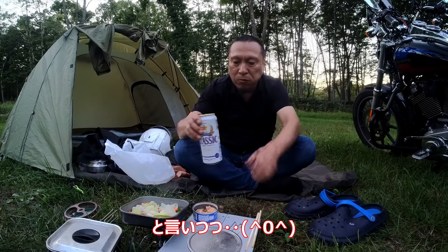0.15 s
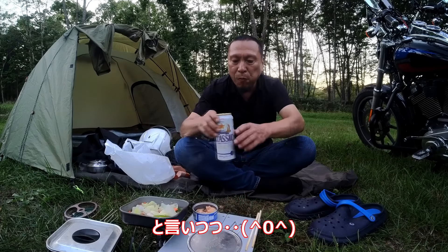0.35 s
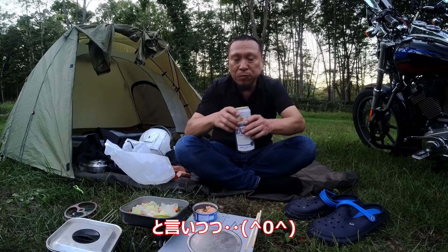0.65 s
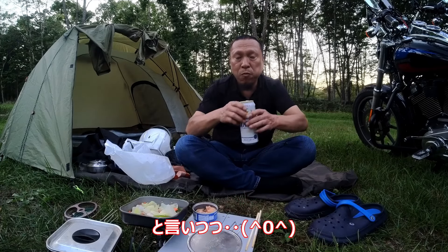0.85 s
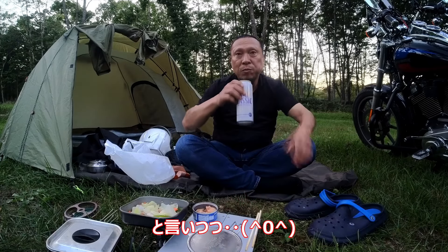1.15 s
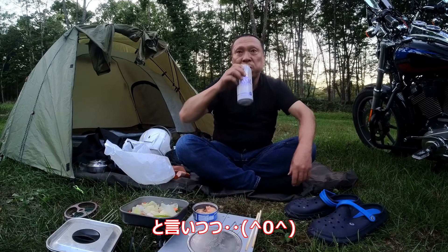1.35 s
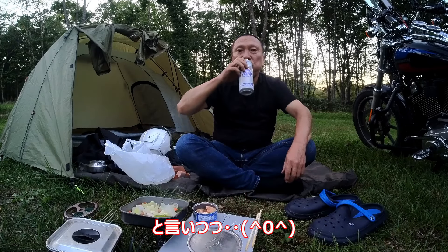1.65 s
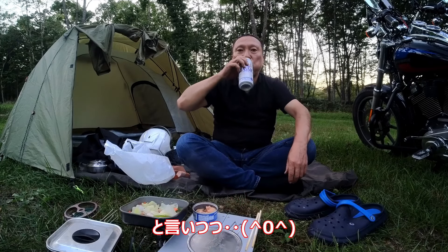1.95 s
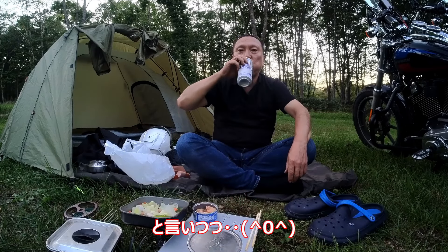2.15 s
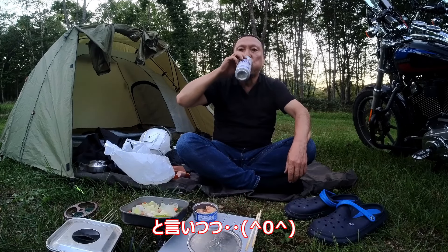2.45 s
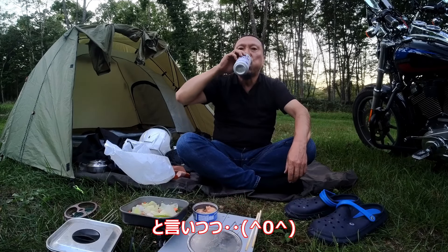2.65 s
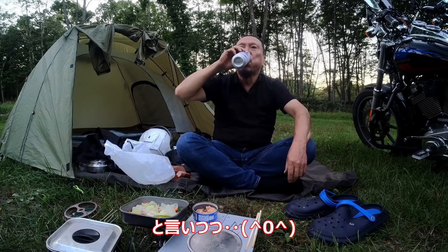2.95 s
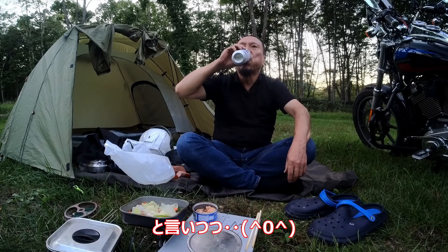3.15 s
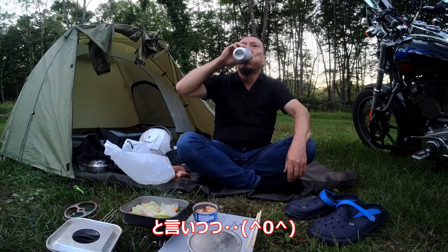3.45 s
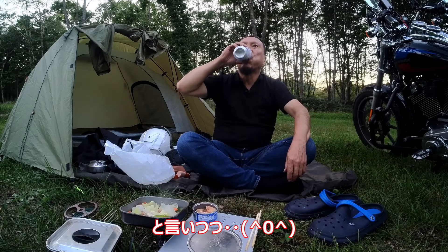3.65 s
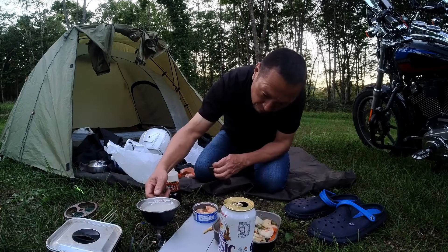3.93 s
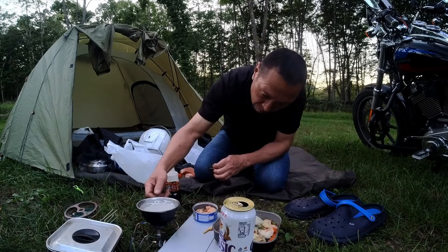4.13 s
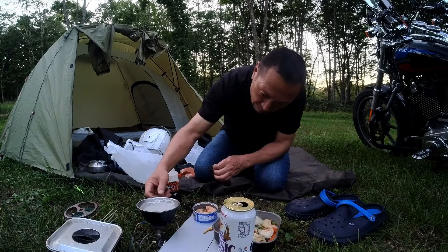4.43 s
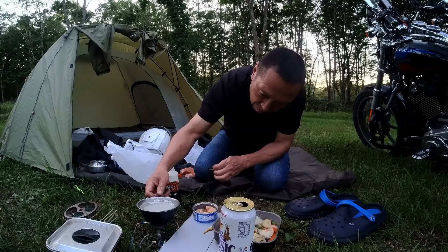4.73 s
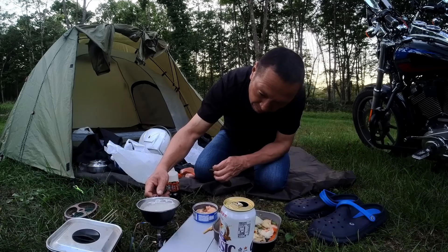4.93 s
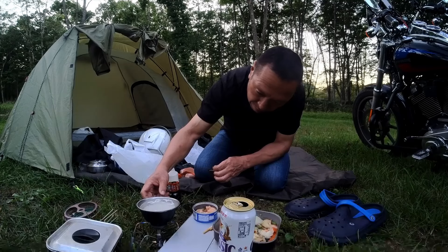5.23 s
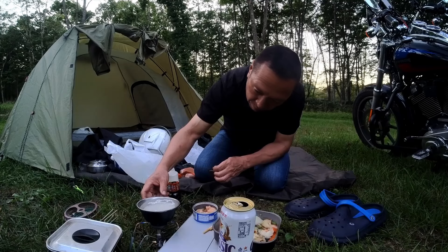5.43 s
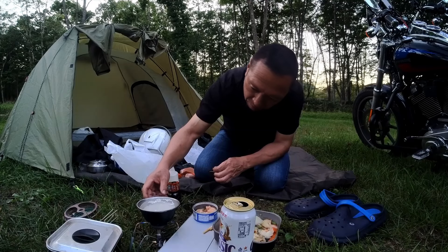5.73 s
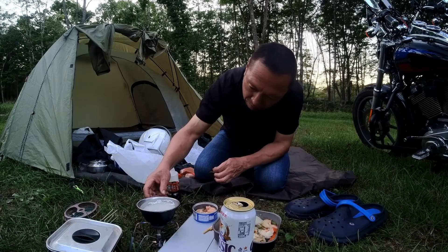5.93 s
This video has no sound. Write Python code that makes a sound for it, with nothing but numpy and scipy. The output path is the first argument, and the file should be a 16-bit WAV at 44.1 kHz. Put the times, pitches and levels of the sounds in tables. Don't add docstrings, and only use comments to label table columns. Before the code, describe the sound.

Close to a camping stove on grass, a steady rushing gas roar mixes with fine fat sizzle, irregular metallic pan ticks and sharp spits. A drink can is tapped once early on. After nearly four seconds the sound cuts hard to a far quieter hiss under a pot, with soft flame puffs, faint breeze rumble and very distant crickets. Small stereo microphone, dry open air.

```python
import sys
import numpy as np
from scipy import signal
from scipy.fft import rfft, irfft, next_fast_len
from scipy.io import wavfile
from scipy.ndimage import uniform_filter1d, map_coordinates

SR = 44100
rng = np.random.default_rng(int(sys.argv[2]) if len(sys.argv) > 2 else 0)


def store_pcm(level_fs):
    pcm = np.round(np.clip(level_fs, -1, 1) * 32767).astype(np.int16)
    wavfile.write(sys.argv[1], SR, np.atleast_2d(pcm).T)


def voltage_ratio(level):
    return 10 ** (np.asarray(level, float) / 20)


N = 268216
CUT_S = 3.7893

# pitch_hz [Hz], left_db [dB], right_db [dB], likeness [0-1], left_lead [rad]
ROAR_COLOUR = [(525, -40, -42, .9, .1), (596, -17, -20, 1, .1), (684, -4.5, -4, 0.8, 0.18),
               (1050, -2.5, -3, 0.91, 0.33), (1690, -8.5, -7, 1, 0.97), (2275, -6, -3.5, 0.34, 0.84),
               (2990, 0.5, 5.5, 0.69, 2.15), (3476, 1, 0, 1, 2.39), (4500, -2, -15.5, 0.6, 1.67),
               (5140, 1.5, -5.5, 0.73, 2.35), (5850, -5.5, -30, 0.2, 13), (6260, -5, -37.5, .38, 8.2),
               (7370, -9, -26, 0.05, 9.4), (8740, -24, -46.5, .12, 9.6), (9280, -37, -43.5, 0.06, 9.6)]
# pitch_hz [Hz], width_hz [Hz], boost_db [dB]
PAN_AIR = [(1074, 214, 3.5), (1452, 106, 4.5), (1860, 220, 7.5), (2590, 44, 4), (3030, 36, 2.5),
           (5110, 200, 0.5)]
# start_s [s], level_db [dB]
HIGH_FLOW = [
    (0, -39.5),
    (.3, -39.5),
    (1.1, -38.5),
    (1.23, -40),
    (1.4, -39),
    (2.6, -39.5),
    (3, -38.5),
    (3.4, -39),
    (3.79, -39.5),
]


def flame_roar(surge):
    drive = unit(patchy(patchy_db=1.5)) + voltage_ratio(-13) * sizzle(rate=200, spread_db=3.5)
    flicker_db = .5 * surge + .7 * wobble(45)
    flow_db, = curves(HIGH_FLOW)
    return voltage_ratio(flow_db + 3.5 + flicker_db) * unit(ports(drive, ROAR_COLOUR, PAN_AIR))


def sizzle(rate, spread_db):
    size_db = spread_db * np.minimum(rng.exponential(size=N), 2)
    pops = (rng.random(N) < rate / SR) * voltage_ratio(size_db)
    life = voltage_ratio(-60 * np.arange(400) / SR / 0.0036)
    spray = signal.fftconvolve(pops, life)[:N] * rng.standard_normal((2, N))
    return unit(spray + 4 * pops)


# pitch_hz [Hz], left_db [dB], right_db [dB], likeness [0-1], left_lead [rad]
BOOM_COLOUR = [(613, -21, -20, 0.77, 0.11), (650, -14, -13, 0.74, .15), (752, -5.5, -6, 0.99, 0.25),
               (775, -2.5, -1.5, 0.9, .2), (905, -19, -24.5, 0.99, .2)]
# start_s [s], peak_db [dB], length_s [s], pitch_hz [Hz]
CAVITY_BOOMS = [(0.107, -37, 0.025, 803), (0.231, -40, 0.0074, 725), (0.263, -27.5, 0.0054, 721),
                (0.382, -29.5, 0.0055, 700), (0.44, -39, 0.013, 790), (0.488, -35, 0.0069, 730),
                (0.675, -37.5, 0.013, 780), (0.781, -40, 0.023, 757), (0.877, -37, 0.019, 772),
                (1.023, -44, 0.016, 790), (1.134, -38, 0.025, 745), (1.142, -36, 0.024, 770),
                (1.375, -31, 0.007, 723), (1.435, -45, 0.012, 790), (1.454, -32.5, 0.0072, 750),
                (1.599, -29.5, 0.013, 780), (1.645, -39, 0.017, 770), (1.696, -34, 0.016, 744),
                (1.718, -39, 0.01, 770), (1.753, -31, 0.01, 742), (1.806, -32.5, 0.016, 743),
                (1.908, -35, 0.012, 756), (2.003, -32, 0.016, 740), (2.122, -33.5, 0.012, 748),
                (2.226, -43, 0.011, 780), (2.287, -38, 0.0087, 810), (2.317, -41, 0.029, 799),
                (2.458, -37.5, 0.026, 775), (2.503, -33.5, 0.016, 777), (2.616, -38.5, 0.032, 746),
                (2.636, -37.5, 0.033, 780), (2.732, -37, 0.029, 767), (2.761, -36, 0.0093, 757),
                (2.786, -35, 0.016, 736), (2.84, -36, 0.016, 728), (2.904, -36.5, 0.028, 728),
                (2.938, -34, 0.011, 760), (2.973, -35.3, 0.036, 757), (3.024, -42, 0.017, 750),
                (3.089, -36.5, 0.031, 750), (3.22, -33, 0.028, 761), (3.228, -29, 0.013, 727),
                (3.275, -44, 0.013, 750), (3.449, -40.5, 0.015, 710), (3.511, -37.5, 0.027, 781),
                (3.676, -35.5, 0.014, 753), (3.762, -31, 0.016, 778)]
# start_s [s],
# peak_db [dB], length_s [s], pitch_hz [Hz]
PAN_POCKETS = [(0.284, -44.5, 0.039, 343), (0.361, -47.5, 0.034, 376), (0.423, -45.5, 0.034, 355),
               (0.643, -47.2, 0.022, 352), (0.721, -45, 0.025, 322), (0.837, -48, 0.027, 332),
               (0.877, -41, 0.028, 527), (0.882, -48, 0.019, 318), (0.905, -49, 0.072, 273.6),
               (1.411, -47, 0.021, 340), (1.426, -52, 0.11, 420), (1.451, -49.5, 0.029, 323),
               (1.519, -47, 0.017, 405), (1.79, -49.5, 0.051, 338), (1.873, -42, 0.016, 376),
               (1.92, -46.5, 0.046, 294), (2.12, -49, 0.053, 409), (2.369, -50.9, 0.072, 403),
               (2.495, -48.5, 0.074, 376), (2.555, -47.5, 0.027, 441), (2.657, -45.5, 0.066, 341),
               (2.672, -61, 0.12, 323), (2.679, -49, 0.038, 458), (2.787, -46, 0.038, 345),
               (2.939, -49, 0.069, 382.5), (3.288, -45, 0.018, 360), (3.535, -48.5, 0.051, 366),
               (3.675, -43.5, 0.024, 354), (3.694, -60, 0.041, 385), (3.713, -49.5, 0.14, 373),
               (3.762, -46.5, 0.017, 260)]


def pan_boom(surge):
    swell = voltage_ratio(.8 * surge + 2.5 * wobble(60))
    bed = unit(swell * ports(patchy(patchy_db=.8), BOOM_COLOUR))
    booms = whumps(CAVITY_BOOMS, waver=0.0247, pan_db=0.0, lead=0.3, trim_db=-3.0)
    pockets = whumps(PAN_POCKETS, waver=.09, pan_db=2.9, lead=.3, trim_db=-2.5)
    return voltage_ratio(-49.5) * bed + booms + pockets


def high_flame():
    surge = wobble(16)
    return flame_roar(surge) + pan_boom(surge)


# start_s [s], snap_db [dB], body_db [dB], body_pitch_hz [Hz], snap_t60_s [s]
TICKS = [(0.261, -43, 8.5, 960, 0.014), (0.379, -30, 2, 1010, 0.013), (0.4834, -40, -10, 1430, 0.02),
         (0.5662, -30.5, -15, 2180, 0.041), (0.687, -32.5, -9, 1830, 0.012), (.7362, -38, 3, 1050, 0.022),
         (0.8684, -31, 0, 1130, 0.02), (0.9834, -37.5, 4, 1200, 0.02), (1.1415, -27.5, -4, 1100, 0.033),
         (1.3325, -32.5, 2, 1400, 0.026), (1.5822, -36, -3, 1000, 0.02), (1.7547, -31, 1, 1100, 0.019),
         (1.8407, -41.5, 9.5, 1420, 0.022), (1.8696, -49, -10.5, 1200, 0.013),
         (2.005, -36.5, 9.5, 1390, 0.025), (2.0428, -42.5, -2, 940, .02),
         (2.2878, -20.5, -13.5, 1100, 0.015), (2.2896, -23, -11, 1740, 0.016), (2.4252, -40, 6, 1900, .015),
         (2.4914, -50, -9, 1200, 0.016), (2.785, -37.5, 7, 1320, 0.028), (2.9324, -31, -4, 2930, 0.02),
         (2.984, -38, 5, 1880, .015), (3.0868, -44, -3, 1895, 0.018), (3.2224, -37.5, 10.5, 1310, 0.019),
         (3.261, -32, 1, 1050, 0.026), (3.7012, -36.5, 3, 1140, 0.018)]
# pitch_hz [Hz], level_db [dB]
PAN_RING = [(4050, -5), (4700, -15), (5250, -4), (6100, -12)]
# pitch_hz [Hz], left_db [dB], right_db [dB], likeness [0-1], left_lead [rad]
SNAP_COLOUR = [(500, -32.5, -26.5, .8, .1), (700, -4.5, -3, .9, .2), (960, 0.5, -2.5, 0.91, 0.72),
               (2880, 3.5, 11.5, 0.93, 2), (3830, 1, -34.5, .4, 10), (6940, 8, -9, 0.28, 3.8),
               (7900, -8, -29.5, .2, 3), (10500, -43, -51.5, .3, 3), (13000, -45, -58, 0.17, 3)]


def ticks():
    out = np.zeros((2, N))
    t = np.arange(1500) / SR

    def band(lo_hz, hi_hz):
        sos = signal.butter(2, [lo_hz, hi_hz], "band", fs=SR, output="sos")
        return unit(signal.sosfilt(sos, rng.standard_normal((2, len(t)))))

    def dies(t60):
        return voltage_ratio(-60 * t / t60) * (1 - np.exp(-t / 0.00057))

    ring = sum(voltage_ratio(level_db) * np.sin(2 * np.pi * hz * t) for hz, level_db in PAN_RING)
    for s, snap_db, body_db, body_hz, t60 in TICKS:
        snap = (.5 * band(2600, 6900) + ring) * dies(t60)
        snap = snap + 0.84 * band(900, 9000)[0] * dies(0.0037)
        tone = 0.83 * band(750, 2600) + 0.92 * np.sin(2 * np.pi * body_hz * t)
        body = voltage_ratio(body_db) * tone * dies(0.94 * t60)
        out[:, round(s * SR):][:, :len(t)] += voltage_ratio(snap_db - 1.5) * (snap + body)
    return ports(out, SNAP_COLOUR)


# start_s [s], peak_db [dB], pitch_hz [Hz], t60_s [s],
# left_over_right_db [dB]
CLICKS = [(.3797, -21, 4100, .012, 10), (.3797, -25, 2900, .005, -2), (.3799, -25, 5400, .008, 10),
          (.5681, -20, 3700, .005, 3), (.5679, -21, 5400, .012, 9), (.6876, -25, 2600, .005, 0),
          (1.1413, -24, 4000, .006, 6), (2.0046, -27, 1400, .008, 0), (2.2894, -20, 1100, .01, 0),
          (2.2900, -18, 3400, .005, 0), (2.2906, -24, 7400, .005, 16), (.6877, -21, 4050, .016, 10),
          (.6879, -21, 5250, .012, 9), (1.1411, -19, 5200, .012, 9), (1.1410, -26, 2900, .012, -2),
          (1.1500, -26, 1700, .006, 0), (2.0072, -26, 4600, .01, 10), (2.2880, -27, 6100, .02, 16),
          (2.2891, -17, 5900, .014, 14), (2.2896, -16, 1900, .009, -2), (2.2901, -13, 4700, .011, 9),
          (2.2930, -24, 6400, .01, 16), (2.9331, -24, 4600, .01, 10), (3.0870, -19, 1500, .006, 0),
          (3.2030, -27, 1300, .02, 0), (3.2215, -24, 1250, .025, 0), (3.0873, -27, 5400, .01, 9)]


def clicks():
    attack_s, right_lag_s = .0002, .00011
    out = np.zeros((2, N))
    t = np.arange(SR // 20) / SR
    since = np.maximum(t - np.array([[0], [right_lag_s]]), 0)
    for s, db, hz, t60, pan_db in CLICKS:
        envelope = voltage_ratio(db - 60 * since / t60) * (1 - np.exp(-since / attack_s))
        ring = envelope * np.sin(2 * np.pi * hz * since)
        out[:, round(s * SR):][:, :len(t)] += ring * voltage_ratio([[min(pan_db, 0)], [-max(pan_db, 0)]])
    return signal.sosfilt(signal.butter(4, (720, 7900), "band", fs=SR, output="sos"), out)


# pitch_hz [Hz], level_db [dB], t60_s [s]
CAN_MODES = [(520, -7, 0.11), (743, -3.5, 0.031), (860, -32, 0.015), (1000, -5, 0.024), (1240, -17, .03),
             (1820, -13, .03), (2010, -11, 0.027), (2340, -7, 0.026), (2620, -16, 0.014),
             (4630, -14, 0.023), (5220, -15, .015)]


def can_tap():
    start_s, peak_db = .5678, -11
    out = np.zeros(N)
    t = np.arange(SR // 8) / SR
    ring = 0
    for k, (hz, db, t60) in enumerate(CAN_MODES):
        ring = ring + (-1) ** k * voltage_ratio(db - 60 * t / t60) * np.sin(2 * np.pi * hz * t)
    out[round(start_s * SR):][:len(t)] = voltage_ratio(peak_db - 6) * ring * (1 - np.exp(-t / .0005))
    wall = signal.butter(2, [420, 7000], "band", fs=SR, output="sos")
    return signal.sosfilt(wall, out) * voltage_ratio([[.6], [-.6]])


# pitch_hz [Hz], left_db [dB], right_db [dB], likeness [0-1], left_lead [rad]
HISS_COLOUR = [(504, -20.5, -17.5, 0.85, 0), (750, -17.5, -18, 0.9, 0.6), (1050, -19, -15, 0.54, 0.6),
               (1400, -15, -3, 0.77, -1.5), (2030, -10, -0.5, 0.42, 0.5), (2530, -13.5, 2.5, 0.23, 1.5),
               (2965, -14, 4, 0.088, -0.5), (3570, -14, -7.5, .1, 5), (4260, -15, -25.5, .08, 1),
               (4800, -12.5, -42, .05, -1), (5900, -19.5, -20.5, .05, -5), (7030, -10.5, -39, .05, 8),
               (8470, -18, -38, .05, 0), (9120, -40, -36.5, .05, 4)]
# start_s [s], level_db [dB]
LOW_FLOW = [
    (3.8, -56),
    (4.1, -58),
    (4.5, -58.5),
    (4.76, -56.5),
    (4.84, -59.5),
    (5.05, -57),
    (5.6, -58),
    (6.08, -58),
]
# pitch_hz [Hz], left_db [dB], right_db [dB], likeness [0-1], left_lead [rad]
WHISPER_COLOUR = [(3770, -7, -31, .1, 2), (3920, 5.5, -15, .1, 2), (4430, -17, -27, .1, 2),
                  (5030, -1, -10, .1, 2), (6000, -9.5, -16, .1, 2), (6300, 4.5, -16, .1, 2),
                  (6540, -16, -21, .1, 2)]
# start_s [s], level_db [dB]
RIM_FLOW = [(3.82, -60), (3.89, -54.5), (4.22, -72), (4.29, -55.5), (4.49, -72), (4.64, -61), (5.69, -55.5),
            (5.72, -74), (5.93, -74), (5.98, -62), (6.08, -69)]


def flame_hiss():
    flow_db, = curves(LOW_FLOW)
    rim_db, = curves(RIM_FLOW)
    hiss = voltage_ratio(flow_db + 10.5) * unit(ports(patchy(patchy_db=1.6), HISS_COLOUR))
    whisper = voltage_ratio(rim_db - 3.5) * unit(ports(patchy(patchy_db=2.2), WHISPER_COLOUR))
    return patches(hiss + whisper, [4.5, 1.5], bins=1, frames=18)


# pitch_hz [Hz], left_db [dB], right_db [dB], likeness [0-1], left_lead [rad]
JET_COLOUR = [(5800, -25.5, -42, .1, 2), (6930, -9.5, -31, .1, 2), (7580, 2, -28.5, .25, 2),
              (8040, -29, -43, .1, 2), (8580, -10, -52, .2, -1.5), (9100, -34, -39, .1, -1),
              (9600, -44, -61, .1, -1)]


def gas_jet():
    unsteady = voltage_ratio(.8 * wobble(5) + 2.5 * wobble(130))
    return voltage_ratio(-59) * unit(unsteady * ports(patchy(patchy_db=.8), JET_COLOUR))


# pitch_hz [Hz], width_hz [Hz], left_db [dB], right_db [dB]
POT_AIR = [(1435, 79, -60.5, -57.5), (1880, 110, -66.5, -59.5), (2530, 120, -69, -75), (3000, 58, -67, -69),
           (3624, 61, -61, -73)]
# pitch_hz [Hz], width_hz [Hz], left_db [dB], right_db [dB]
THROAT = [(1065, 72, -.5, .5)]
# start_s [s], level_db [dB], length_s [s]
SONGS = [
    (4.37, -66.5, 0.2),
    (4.77, -63.5, 0.13),
    (4.94, -61.5, 0.13),
    (5.35, -70, 0.37),
    (5.46, -64, 0.046),
    (5.75, -61, 0.042),
    (5.93, -63.5, 0.24),
]


def pot_song():
    throat_db = swells(SONGS, -83, spread=0.35) - 0.5
    throat = voltage_ratio(throat_db + 5.0) * choir(THROAT, rate=5, swell_db=1.0, alike=0.55)
    return throat + choir(POT_AIR, rate=12, swell_db=3.5, alike=.5)


# start_s [s], peak_db [dB], length_s [s],
# pitch_hz [Hz]
POT_POCKETS = [(3.923, -54.5, 0.045, 352), (4.037, -56.5, 0.053, 373), (4.103, -49, 0.01, 253),
               (4.531, -58, 0.022, 347), (4.604, -51, 0.019, 400), (4.613, -52, 0.029, 263),
               (4.752, -56.5, 0.031, 359), (4.844, -55.7, 0.024, 280), (4.95, -44.5, 0.036, 335),
               (4.952, -52, 0.075, 331.7), (4.992, -50.5, 0.02, 229), (5.055, -50, 0.019, 236),
               (5.198, -49, 0.012, 390), (5.201, -53.5, 0.025, 477), (5.391, -53.5, 0.06, 289),
               (5.402, -56, 0.047, 325), (5.428, -52, 0.035, 380), (5.486, -54, 0.024, 257),
               (5.569, -52.5, 0.029, 370), (5.605, -48, 0.049, 250), (5.611, -59, 0.074, 205),
               (5.747, -51, 0.041, 254), (5.814, -54, 0.044, 335), (5.967, -57.5, 0.047, 410),
               (4.78, -47.5, 0.045, 127),
    (5.61, -49, 0.057, 162),
]


def low_flame():
    pockets = whumps(POT_POCKETS, waver=.09, pan_db=3.5, lead=.2, trim_db=-0.9)
    return flame_hiss() + gas_jet() + pot_song() + pockets


# pitch_hz [Hz], left_db [dB], right_db [dB], likeness [0-1], left_lead [rad]
FLUTTER_COLOUR = [(166, -34, -22.5, 0.48, .05), (251, -8.5, -15, 0.75, .05), (346, -3, -10, 0.76, .05),
                  (430, -3.5, -11.5, 0.82, .05), (542, -13, -17.5, 1, .05), (584, -28.5, -36, .8, .05)]
# start_s [s], level_db [dB]
UNREST = [(0.0, -61.5), (0.81, -52.5), (1.1, -59.5), (1.22, -60.5), (1.47, -55), (1.64, -58), (1.86, -61),
          (1.96, -58), (2.34, -62.5), (2.62, -56.5), (3.03, -58), (3.64, -54.5), (4.17, -70.5),
          (4.4, -67.5), (4.88, -64.5), (5.28, -65), (5.64, -63), (6.08, -64)]
# pitch_hz [Hz], left_db [dB], right_db [dB], likeness [0-1], left_lead [rad]
PUFF_COLOUR = [(59, -26.5, -30, .7, .05), (94, -8, -7, 0.29, .05), (150, -2.5, -7.5, 0.89, .05),
               (205, -3, -6.5, 0.95, .05), (314, -20, -17, 0.67, .05)]
# start_s [s], level_db [dB], length_s [s]
PUFFS = [
    (.41, -59, 0.11),
    (.94, -61, 0.08),
    (1.58, -62.5, 0.14),
    (2.06, -69, 0.092),
    (2.48, -63.5, 0.074),
    (3.53, -63, 0.081),
    (3.77, -61, 0.063),
    (4.78, -59.5, 0.069),
    (5.61, -50.5, 0.093),
]


def flutter():
    flap_db, = curves(UNREST)
    puff_db = swells(PUFFS, (-67.5, -69.5), spread=0.26)
    flap = unit(ports(patchy(patchy_db=4.0, bins=1, frames=10), FLUTTER_COLOUR))
    puff = unit(ports(patchy(patchy_db=0.8), PUFF_COLOUR))
    return voltage_ratio(flap_db + 2.0) * flap + voltage_ratio(puff_db + 0.15) * puff


# pitch_hz [Hz], left_db [dB], right_db [dB], likeness [0-1], left_lead [rad]
BREEZE_COLOUR = [(12, -13.5, -26, .45, .05), (35.2, -10, -6.5, 0.28, .05), (73, -0.5, -2.5, 0.84, .05),
                 (135, -13.5, -7, 0.71, .05)]
# start_s [s], level_db [dB], length_s [s]
GUSTS = [(0.31, -67, 0.073), (0.47, -64, 0.1), (0.63, -67, 0.11), (0.94, -74, 0.097), (1.33, -68, 0.14),
         (1.72, -62, 0.064), (2.04, -58, 0.17), (2.24, -69, 0.078), (2.61, -60.5, 0.082), (2.94, -66, 0.12),
         (3.53, -62, 0.22), (4.79, -57, 0.061), (5.25, -65.5, 0.059), (5.63, -63, 0.11)]


def breeze():
    gust_db = swells(GUSTS, -72.5, spread=0.4)
    rumble = unit(voltage_ratio(1.3 * wobble(41)) * ports(patchy(patchy_db=2.9), BREEZE_COLOUR))
    return voltage_ratio(gust_db + 3.0) * rumble


# pitch_hz [Hz], width_hz [Hz], left_db [dB], right_db [dB]
CRICKETS = [(5000, 64, -68, -65), (5630, 35, -69.5, -78), (5560, 75, -77.5, -81.5), (6950, 60, -80.5, -83),
            (8250, 40, -77.5, -83.5)]


def crickets():
    return choir(CRICKETS, rate=17, swell_db=3.5, alike=.1)


def whumps(rows, waver, pan_db, lead, trim_db):
    pitch_sag = 0.036
    sudden = 1.4
    t = np.arange(N) / SR
    out = np.zeros((2, N))
    drift = np.cumsum(waver * wobble(70)) / SR
    for s, db, length, hz in rows:
        near = slice(max(round((s - 2 * length) * SR), 0), round((s + 2 * length) * SR))
        since = t[near] - s
        u = since / length + .2
        turns = hz * (since - .5 * pitch_sag * u * since + drift[near])
        bell = np.exp(-2 * (u * np.where(u < 0, sudden, 1 / sudden)) ** 2)
        out[:, near] += voltage_ratio(db) * bell * np.sin(2 * np.pi * turns - [[0], [lead]])
    rough_db = 3 * waver / 0.18 * wobble(50)
    return out * voltage_ratio(np.array([[trim_db + pan_db], [trim_db - pan_db]]) + rough_db)


def choir(lines, rate, swell_db, alike):
    m = next_fast_len(N)
    hz = np.fft.rfftfreq(m, 1 / SR)
    out = np.zeros((2, N))
    for c, w, left_db, right_db in lines:
        a, b = irfft(rfft(rng.standard_normal((2, m))) / (1 + ((hz - c) / w) ** 4), m)[:, :N]
        song = voltage_ratio(swell_db * wobble(rate)) * np.array([a, alike * a + (1 - alike) * b])
        out += voltage_ratio([[left_db], [right_db]]) * unit(song)
    return out


def ports(pair, table, peaks=()):
    m = next_fast_len(N + 8192)
    hz = np.fft.rfftfreq(m, 1 / SR)
    f, *cols = np.transpose(table)
    left_db, right_db, alike, lead = [np.interp(np.log(hz + 1), np.log(f), c) for c in cols]
    bumps_db = sum(db / (1 + ((hz - c) / w) ** 2) for c, w, db in peaks)
    inside = voltage_ratio(bumps_db) * (hz > f[0] * .9) * (hz < f[-1] * 1.03)
    shared, private = rfft(pair, m) * inside
    alike = np.clip(alike, 0, 1)
    right = alike * shared * np.exp(-1j * lead) + np.sqrt(1 - alike ** 2) * private
    return irfft([shared * voltage_ratio(left_db), right * voltage_ratio(right_db)], m)[:, :N]


def patches(x, depth_db, bins, frames):
    z = signal.stft(x, nperseg=512)[2]
    field = uniform_filter1d(rng.standard_normal(z.shape[1:]), bins, 0)
    field = uniform_filter1d(field, frames, 1)
    gain = voltage_ratio(np.reshape(depth_db, (-1, 1, 1)) * unit(field))
    return signal.istft(z * gain, nperseg=512)[1][:, :N]


def patchy(patchy_db, bins=6, frames=8):
    return patches(rng.standard_normal((2, N)), patchy_db, bins, frames)


def swells(rows, calm_db, spread):
    t = np.arange(N) / SR
    calm = np.where(t < CUT_S, *np.broadcast_to(calm_db, 2))
    power = sum(voltage_ratio(2 * db) * np.exp(-((t - s) / (spread * length)) ** 2) for s, db, length in rows)
    return 10 * np.log10(power + voltage_ratio(2 * calm))


def curves(rows):
    s, *cols = np.transpose(rows)
    return [np.interp(np.arange(N) / SR, s, c) for c in cols]


def wobble(rate):
    return map_coordinates(rng.standard_normal(int(N * rate / SR) + 4), [np.arange(N) * rate / SR])


def unit(x):
    return x / np.sqrt(np.mean(x ** 2) + 1e-20)


def scene():
    after = np.arange(N) - round(CUT_S * SR)
    pan_side = high_flame() + ticks() + clicks() + can_tap()
    both = np.where(after < 0, pan_side, low_flame())
    late = after - np.array([[1], [0]])
    click = voltage_ratio([[-31], [-34]]) * (late >= 0) * np.exp(-np.abs(late) / 4)
    return both + click + flutter() + breeze() + crickets()


def frayed(x, edge_hz, ragged_hz):
    hz, t, z = signal.stft(x, SR, nperseg=1024)
    jumps = rng.standard_normal((2, 1, len(t) // 2 + 1)).repeat(2, axis=2)[..., :len(t)]
    edge = edge_hz + ragged_hz * jumps
    keep = (hz[:, None] < edge) | (hz[:, None] > 9570)
    return signal.istft(z * keep, SR, nperseg=1024)[1][:, :N]


def low_pass(x):
    return signal.sosfilt(signal.butter(12, 15720, fs=SR, output="sos"), x)


def record(dry):
    fade = np.clip(np.arange(N)[::-1] / .001 / SR, 0, 1)
    above = signal.butter(8, 10400, "high", fs=SR, output="sos")
    grit = voltage_ratio(-90.0) * signal.sosfilt(above, rng.standard_normal(dry.shape))
    mix = frayed(fade * dry, edge_hz=9460, ragged_hz=360) + grit
    return low_pass(mix)


dry = scene()
out = record(dry)
store_pcm(out)
```